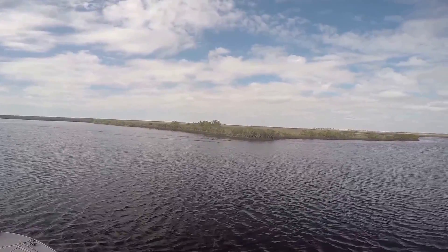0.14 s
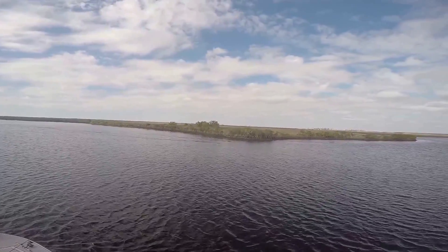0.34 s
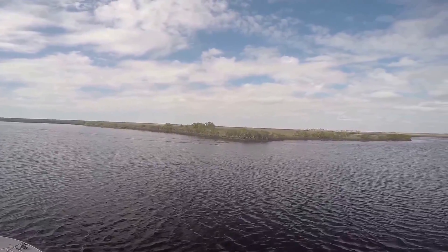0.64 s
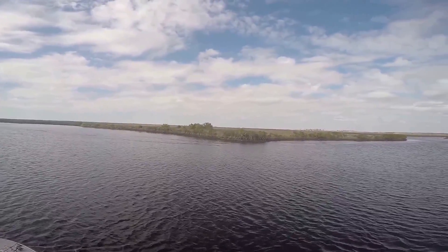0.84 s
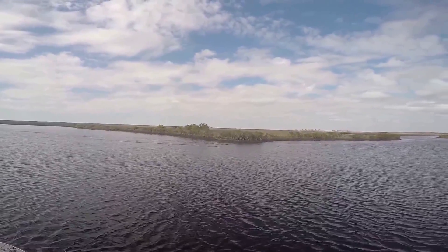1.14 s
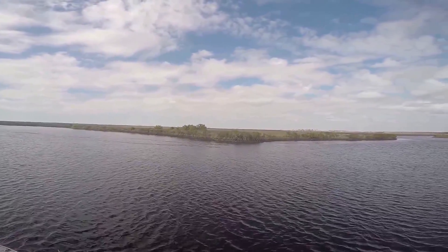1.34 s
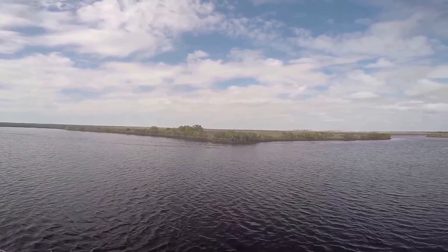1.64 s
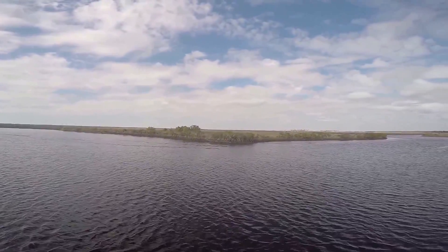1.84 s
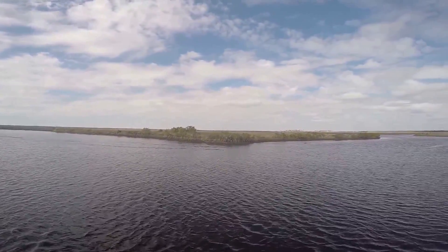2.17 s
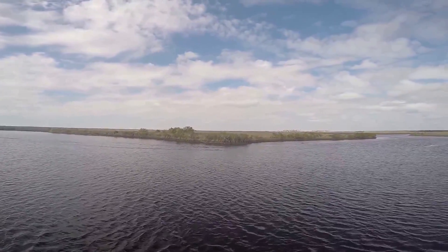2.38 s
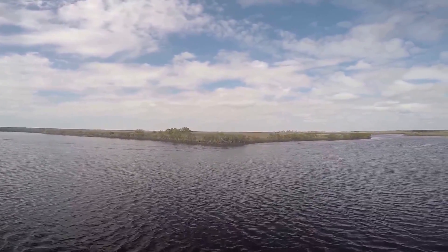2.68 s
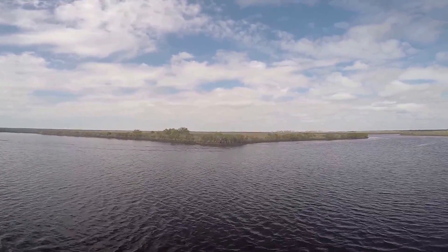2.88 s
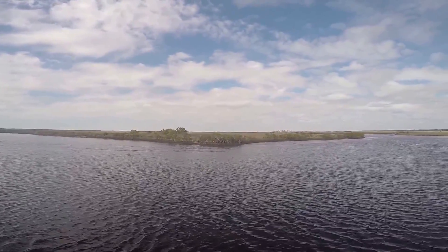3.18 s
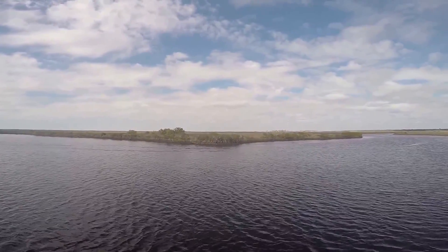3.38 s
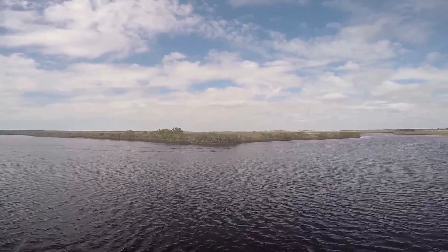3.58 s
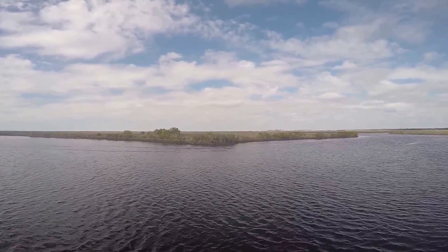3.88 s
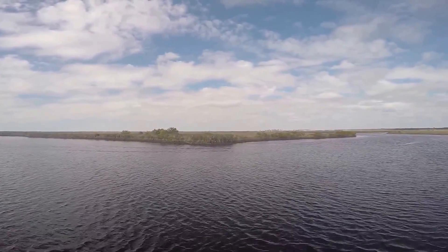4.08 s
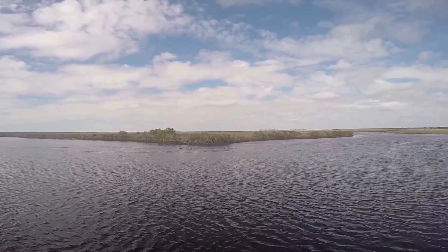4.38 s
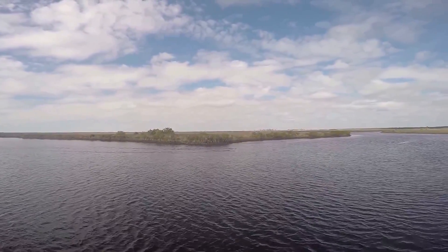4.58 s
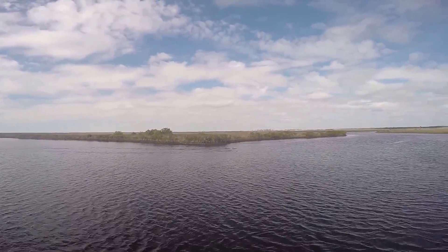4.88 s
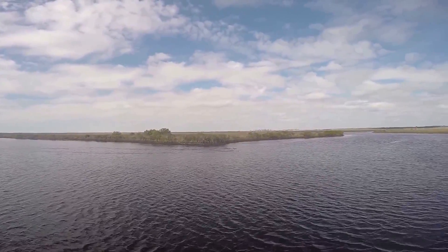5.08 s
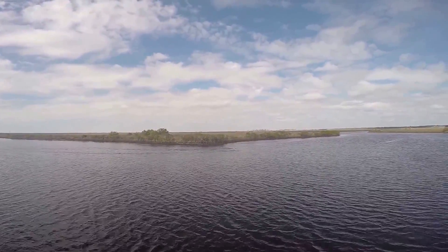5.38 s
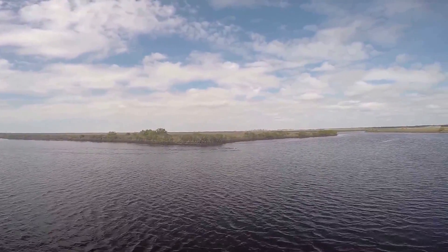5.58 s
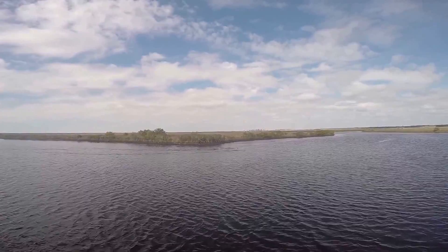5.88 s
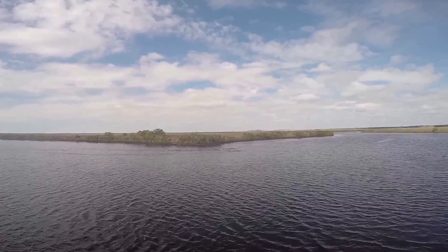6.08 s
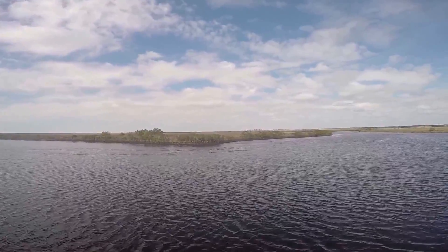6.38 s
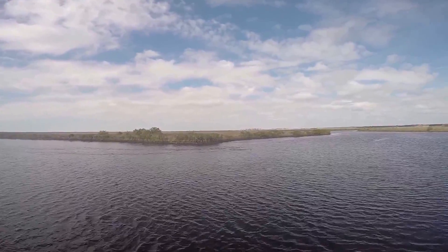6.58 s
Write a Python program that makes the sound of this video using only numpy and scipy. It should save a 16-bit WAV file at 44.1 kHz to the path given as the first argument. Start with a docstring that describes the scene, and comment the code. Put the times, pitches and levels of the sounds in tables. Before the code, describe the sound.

Water rumbles, washes and fizzes softly along a boat's hull throughout, over a very faint steady hiss. At about 0.8 seconds a stiff fitting begins slipping in jerks, roughly five a second. Each jerk is a very short, bright, almost click-like rasp joined to a deep, soft thump that shakes the deck under the microphone, well above the water. The rasps are sharpest between 1 and 2.2 seconds, then pause briefly and resume at 2.6. Faint hollow hull knocks fall near 1.4, 1.5 and 2.2 seconds, with clearer dull ones near 4.6 and 5.2. A few tiny scuffs appear from 3.3 seconds on, as the water swells slightly. After 4.5 seconds the rasps are weaker, and from 5.6 the jerks falter and the water eases. One last strong thump and rasp lands at 6.4 seconds. Everything is close, outdoors and without echo.

```python
"""Short rasps and deep thumps, about five a second, come in over the wash of water on a slowly turning boat.
Something stiff is giving way in jerks: each time a tight fitting slips and rasps, then a jolt
shakes the deck under the microphone. A few knocks and light scuffs fall among the jerks.
Behind them the wake rumbles, washes and fizzes along the hull, over a faint steady hiss."""
import sys
import numpy as np
from scipy.fft import rfft, irfft, next_fast_len
from scipy.io import wavfile
from scipy.ndimage import map_coordinates

SR = 44100
rng = np.random.default_rng(int(sys.argv[2]) if len(sys.argv) > 2 else 0)


def inscribe(sig):
    """Save sig as 16-bit PCM at rate SR to the path in sys.argv[1].

    A 1-D sig is mono; a 2-D sig holds one channel per row.
    Samples are clipped to [-1, 1] before scaling.
    """
    pcm = np.round(np.clip(np.atleast_2d(sig).T, -1, 1) * 32767)
    wavfile.write(sys.argv[1], SR, pcm.astype(np.int16))


N = 296616

# Each jerk of the fitting: (start [s], slip length [s], loudest point [share of the slip],
# rasp level [dB], thump peak [dB], dullness [dB])
JERKS = [(.752, 0.02, 0.68, -37.5, -10.5, 4), (.958, 0.015, 0.26, -28.5, -8.5, 2),
         (1.148, 0.013, 0.071, -29.5, -17.5, 1.5), (1.348, .017, 0.3, -28.5, -12.5, 0.5),
         (1.525, .018, 0.48, -27, -10.5, -0.5), (1.722, .023, 0.65, -30, -11.5, 1),
         (1.918, .015, 0.18, -35, -14, -1.5), (2.152, .01, 0.38, -25, -14, 2.5),
         (2.559, .019, 0.24, -33.5, -10.5, 2), (2.758, 0.027, 0.43, -32.5, -13.5, -1.5),
         (2.966, 0.031, 0.52, -34.5, -19.5, -4.5), (3.196, 0.017, 0.042, -28, -13, -3.5),
         (3.387, 0.039, 0.525, -32, -16, -1), (3.626, .036, .55, -38.5, -18.5, -4.5),
         (3.885, .029, .3, -34, -14.5, 1), (4.097, 0.03, 0.46, -35.5, -13, -0.5),
         (4.317, .023, 0.44, -35, -14, 0.5), (4.545, 0.014, 0.39, -41.5, -21, 7.5),
         (4.757, 0.0272, 0.54, -35.5, -10, 5.5), (4.948, 0.053, .65, -44.5, -17, -0.5),
         (5.217, 0.014, 0.45, -39.5, -12.5, 5.5), (5.45, 0.025, 0.91, -41.5, -13.5, 2.5),
         (5.642, 0.046, 0.28, -48.5, -38, 2), (5.72, 0.014, .5, -59, -24, 6),
         (5.927, 0.0333, 0.6, -34.5, -19, -1), (6.159, 0.047, 0.27, -42.5, -40, -3),
         (6.436, .025, 0.46, -31.5, -8, 0.5)]
def rasps(slips_per_s=2400, catch_s=0.006, catch_db=3, settle_db=-24, fade_60db_s=0.13):
    """Each slip is a swelling, stuttering burst of tiny slips that rings the fitting, then settles."""
    out, t = np.zeros(N), np.arange(SR // 10) / SR
    for start, length, crest, db, _, dull_db in JERKS:
        crest = np.clip(crest, 0.05, 0.95)
        since_crest = t - crest * length
        swell = np.interp(t / length, [0, crest, 1], [0.088, 1, 0])
        stutter = amp(-catch_db * np.sin(np.pi * since_crest / catch_s) ** 2)  # it keeps catching
        settling = (since_crest > 0) * amp(settle_db - 60 * np.abs(since_crest) / fade_60db_s)
        friction = grains(len(t), slips_per_s, spread_db=3.5) + rng.standard_normal(len(t))
        rub = (swell * stutter + settling) * friction
        ring = filtered(rub, lambda hz: fitting(hz, dull_db))
        slip_average = np.linalg.norm(ring) / np.sqrt(length * SR)
        add(out, start, amp(db) * ring / slip_average)
    return out


# The pitches at which the fitting rings: (pitch [Hz], width [Hz], relative level [dB])
FITTING_RINGS = [(760, 260, -7.5), (1510, 500, -4.5), (2010, 550, -3.5), (2672, 297, 9.5), (3472, 680, 7),
                 (3777, 240, 3.5), (4326, 570, -1), (5140, 88, -11), (5820, 380, -10), (6370, 83, -7.5),
                 (7330, 920, -4.5), (8530, 2200, -25.5), (9500, 1340, -22.5), (10500, 400, -21),
                 (12100, 400.0, -33), (12730.0, 1700, -31)]
def fitting(hz, dull_db, vary_db=0.82):
    """How the fitting rings when rubbed; the point of contact changes how strongly each pitch sounds."""
    low_db = 1 + 1.22 * dull_db  # a dull slip has more low ring and less high ring
    main_db = 0.5 + 0.79 * dull_db
    high_db = 0.5 - 0.37 * dull_db
    power = amp(-110)
    for centre, width, db in FITTING_RINGS:
        low, main, high = 1000 < centre < 2300, 2300 < centre < 3000, centre > 5400
        db = db + vary_db * rng.standard_normal() + low_db * low + main_db * main + high_db * high
        power = power + amp(db) ** 2 / (1 + (2 * (hz - centre) / width) ** 2) ** 2
    # Make the ringing come after the rub, never before it (a minimum-phase filter).
    cepstrum = irfft(np.log(power) / 2)
    cepstrum[1:len(hz) - 1] *= 2
    cepstrum[len(hz):] = 0
    return np.exp(rfft(cepstrum))


# Deep rings that a jolt passes in turn, from hull to microphone mount: (pitch [Hz], width [Hz])
DECK_RINGS = [(18.9, 10.1), (36.9, 31.9), (49.1, 13.4)]
def thumps(soft_hz=88, share_of_slip=0.81):
    """Near the end of each slip in JERKS, a soft jolt heaves the deck, and a weak ring follows."""
    def deck(hz):
        rings = [1j * hz * width / (pitch ** 2 - hz ** 2 + 1j * hz * width)
                 for pitch, width in DECK_RINGS]
        return np.prod(rings, axis=0) / (1 + 1j * hz / soft_hz)  # a soft contact passes only the lows

    out, jolt = np.zeros(N), np.zeros(SR // 2)
    jolt[0] = 1
    swing = filtered(jolt, deck)
    for start, length, _, _, db, _ in JERKS:
        add(out, start + share_of_slip * length, amp(db) * swing / np.abs(swing).max())
    return out


# The tone of the hull when struck: (frequency [Hz], relative level [dB])
HULL_TONE = [(60, -5), (120, 11), (350, -6), (700, -7), (1100, -10.5), (2200, -17), (4500, -11.5),
             (8000, -45)]
# Knocks on the hull: (time [s], clack level [dB], note pitch [Hz], note compared with clack [dB])
HULL_KNOCKS = [(1.354, -49.5, 724, 11.5), (1.532, -50.5, 613, 12.5), (2.154, -48.5, 1350, 13),
               (4.556, -29.5, 446, -10), (5.227, -28.5, 182, 1.5)]
def knocks(rise_s=0.0017, fade_60db_s=0.039):
    """A harder contact gives a dull, dead clack of the hull with one short hollow note in it."""
    out, t = np.zeros(N), np.arange(SR // 8) / SR
    blow = (1 - np.exp(-t / rise_s)) * amp(-60 * t / fade_60db_s)
    for start, db, note_hz, note_db in HULL_KNOCKS:
        clack = coloured(rng.standard_normal(len(t)), HULL_TONE)
        note = amp(note_db) * np.sin(2 * np.pi * note_hz * t)
        add(out, start, amp(db) * blow / blow.max() * (clack + note))
    return out


# Light rubs: (start [s], length [s], pitch [Hz], width [octaves], level [dB])
LIGHT_SCUFFS = [(3.259, 0.0044, 3600, 0.18, -38), (3.336, .018, 7300, .12, -63),
                (3.866, .017, 5800, .23, -45.5), (5.442, 0.0072, 3550, .6, -53),
                (6.156, .016, 5600, .27, -47), (6.615, 0.043, 7350, .07, -68)]
def scuffs():
    """Brief glancing rubs, each a puff of noise around one pitch."""
    out, t = np.zeros(N), np.arange(SR // 20) / SR
    for start, length, centre, width, db in LIGHT_SCUFFS:
        band = lambda hz: np.exp(-0.5 * (np.log2((hz + 1) / centre) / width) ** 2)
        puff = unit(filtered(rng.standard_normal(len(t)), band))
        stroke = np.sin(np.pi * np.sqrt(np.clip(t / length, 0, 1)))
        add(out, start, amp(db) * stroke * puff)
    return out


# How strongly the boat stirs the water: (time [s], strength [dB])
WAKE_STRENGTH = [(0.0, -59.5), (0.57, -51.5), (1.02, -55), (1.33, -48.5), (1.41, -54), (1.5, -47),
                 (2.36, -53.5), (2.53, -48), (3.13, -47.5), (3.24, -42.0), (3.56, -53.5), (3.63, -48),
                 (4.53, -46.5), (4.97, -48.5), (5.54, -62.5), (5.71, -51.0), (6.0, -52.5), (6.39, -60.5),
                 (6.64, -56.0), (6.73, -63)]
# The tones of the rumble, the wash and the spray, each: (frequency [Hz], relative level [dB])
RUMBLE_TONE = [(6, -11), (16, -6), (28, -6), (42, 1.5), (53, -0.5), (70, -8.5), (100, -9), (135, -21),
               (185, -23.5), (300, -29), (480, -39.5), (900, -65)]
WASH_TONE = [(200, -4), (480, -6), (750, 5.5), (950, 2.5), (1200, 1), (1600, -3), (2050, -2), (3500, -24.5),
             (5000, -16.5), (9000, -47)]
SPRAY_TONE = [(900, -6), (1800, -0.5), (2060, -5), (2270, 4.5), (2750, 1.5), (3200, 2), (3900, -6),
              (4400, -8.5), (4700, -32), (6200, -23), (7000, -36), (11000, -61)]
def water(usual_wake_db=-51):
    """One wake drives all three: the hull rumbles, the water washes, and small bursting bubbles fizz."""
    surge_db = np.interp(np.arange(N) / SR, *np.transpose(WAKE_STRENGTH)) - usual_wake_db
    # Each level is its usual value, plus some or all of the surge, plus a random waver.
    rumble_db = -34.5 + 0.36 * surge_db + 1.32 * wobble(12)
    rumble = amp(rumble_db) * coloured(rng.standard_normal(N), RUMBLE_TONE)
    wash_db = -56.5 + 0.39 * surge_db + 0.43 * wobble(5.8)
    wash = amp(wash_db) * coloured(rng.standard_normal(N), WASH_TONE)
    bubbles = rng.standard_normal(N) + 0.6 * grains(N, per_s=200, spread_db=3)  # fizz with a few pops
    spray_db = -53.5 + surge_db + 1.43 * wobble(49)
    spray = amp(spray_db) * coloured(bubbles, SPRAY_TONE)
    return rumble + wash + spray


def amp(db):
    """Turn decibels into a number to multiply a sound by."""
    return 10 ** (np.asarray(db) / 20)


def unit(x):
    """Scale a sound to an average (rms) size of 1."""
    return x / np.sqrt(np.mean(x ** 2) + 1e-20)


def wobble(per_s):
    """A smooth curve through per_s random points a second."""
    points = rng.standard_normal(int(N * per_s / SR) + 4)
    return map_coordinates(points, [np.arange(N) * per_s / SR])


def filtered(x, response):
    """Scale and delay each frequency of a sound as response(hz) says."""
    size = next_fast_len(len(x) + 8192)
    hz = np.fft.rfftfreq(size, 1 / SR)
    return irfft(rfft(x, size) * response(hz), size)[:len(x)]


def coloured(x, tone):
    """Shape a sound with a tone table, then scale it to an average size of 1."""
    tone_hz, db = np.transpose(tone)
    return unit(filtered(x, lambda hz: amp(np.interp(np.log(hz + 1), np.log(tone_hz), db))))


def add(track, start_s, sound):
    """Mix a sound into the track at the given time."""
    part = track[max(round(start_s * SR), 0):][:len(sound)]
    part += sound[:len(part)]


def grains(count, per_s, spread_db):
    """Tiny clicks of uneven size at random moments."""
    hit = rng.random(count) < per_s / SR
    return unit(hit * rng.standard_normal(count) * amp(spread_db * rng.standard_normal(count)))


def scene():
    """Everything is close and in the open air, with no echo."""
    return (rasps() + thumps() + knocks() + scuffs() + water())[None]


# The tone of the camera's own hiss: (frequency [Hz], relative level [dB])
HISS_TONE = [(1000, 7), (13300, 3), (13900, -27), (15300, -18)]
def record(dry, hiss_db=-71, top_hz=15350):
    """The camera adds a steady hiss and keeps nothing higher than top_hz."""
    hiss = amp(hiss_db) * coloured(rng.standard_normal(N), HISS_TONE)
    return filtered(dry[0] + hiss, lambda hz: hz < top_hz)[None]


dry = scene()
out = record(dry)
inscribe(out)
```